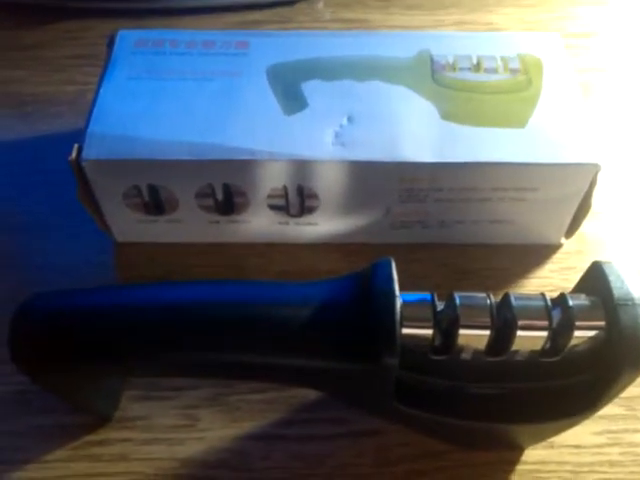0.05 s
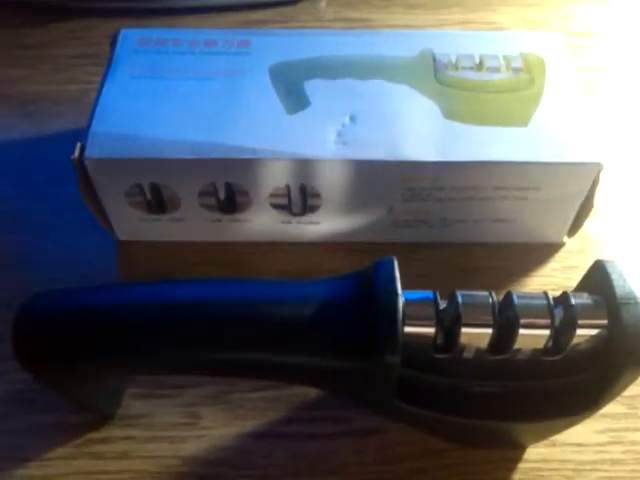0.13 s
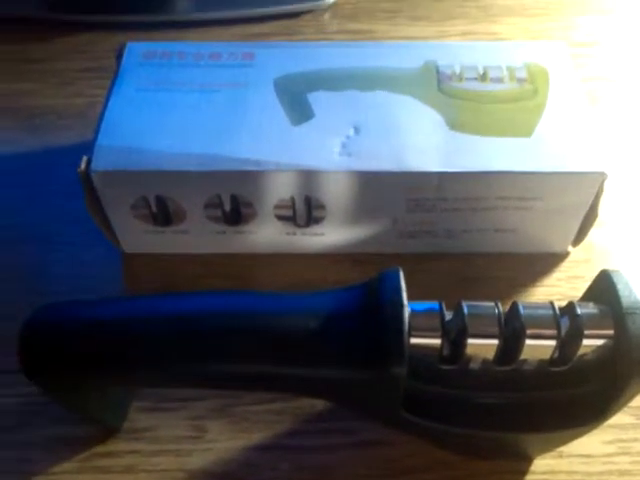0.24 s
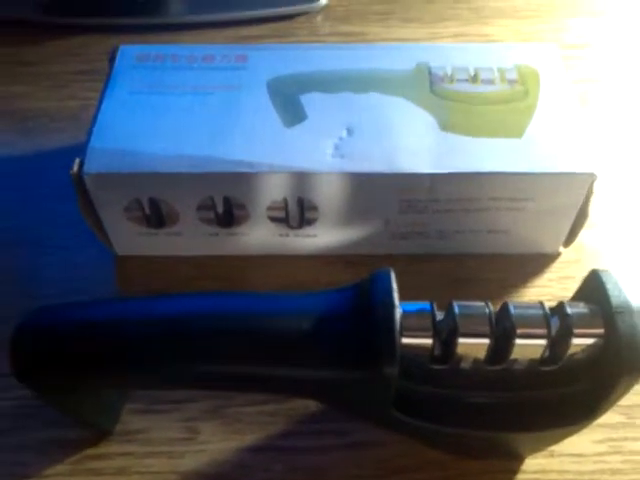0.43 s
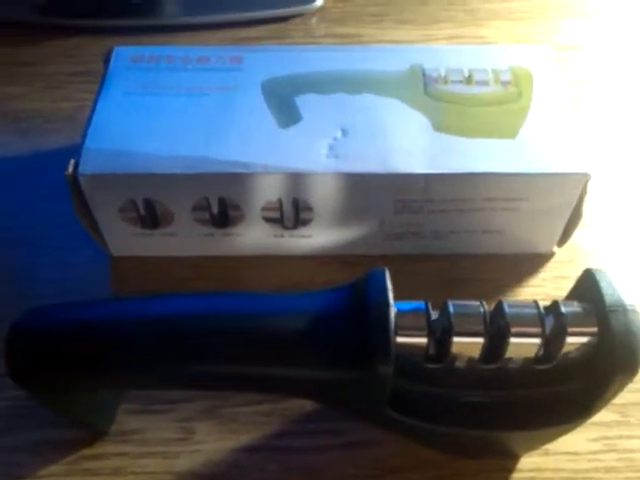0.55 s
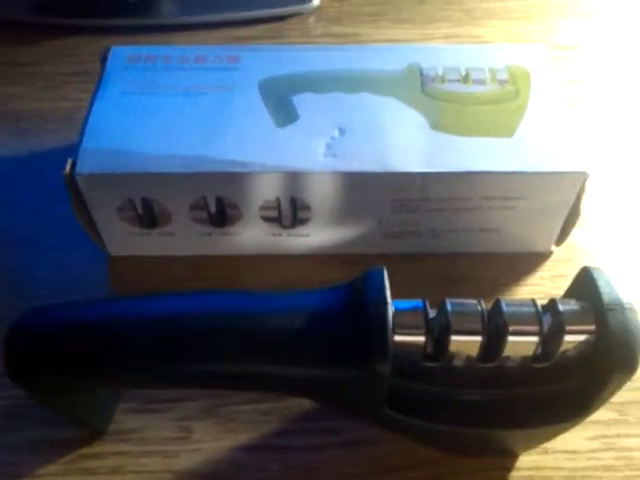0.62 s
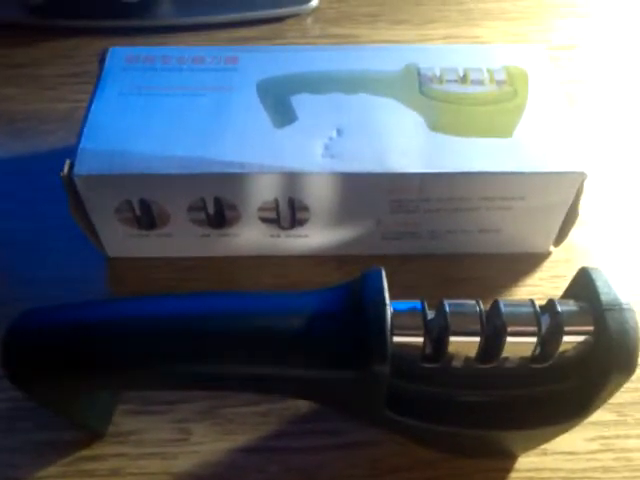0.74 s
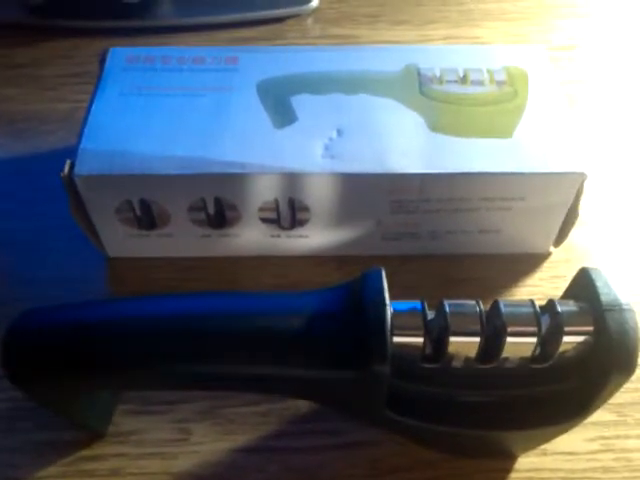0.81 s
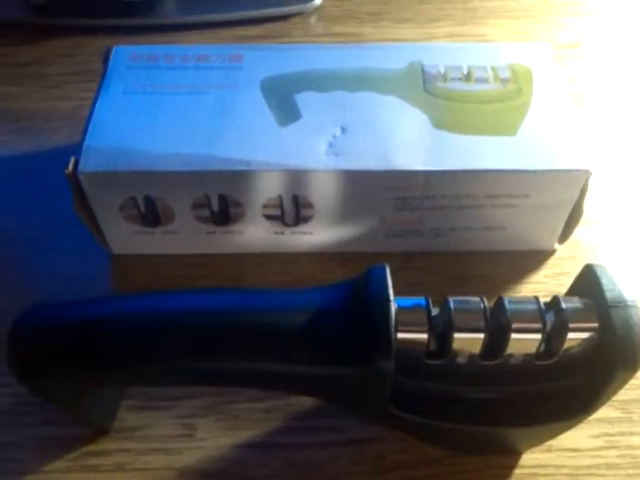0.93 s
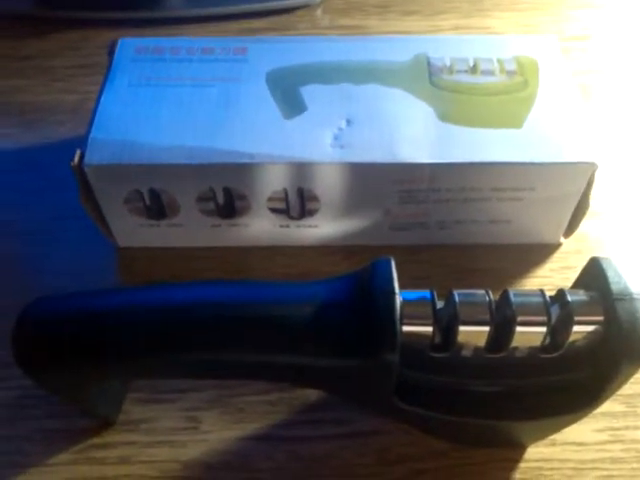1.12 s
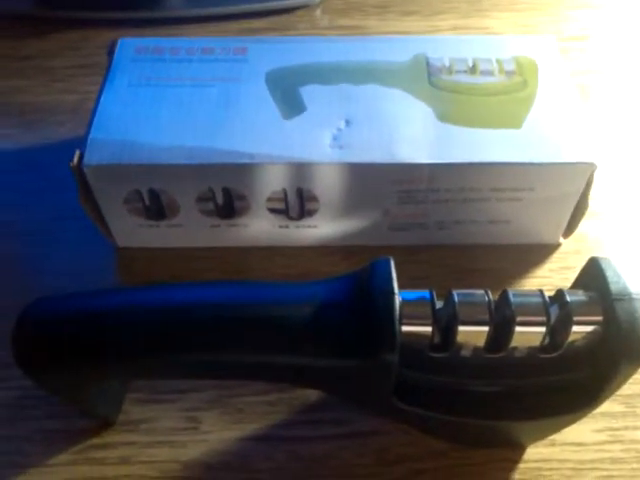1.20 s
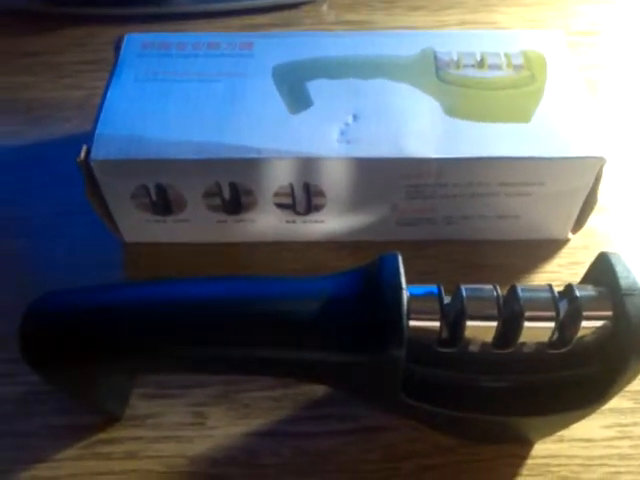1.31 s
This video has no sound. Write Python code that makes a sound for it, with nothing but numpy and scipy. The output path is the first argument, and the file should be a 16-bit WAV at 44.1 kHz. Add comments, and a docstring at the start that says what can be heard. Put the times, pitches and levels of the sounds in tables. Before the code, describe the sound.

One sharp plastic click, with faint ticks over a steady hiss.

```python
"""A small plastic device is held near a microphone, above a wooden table. First its case ticks faintly.
Then a soft nudge and a brief rub lead into one sharp click: the shell snaps and rings for a few
milliseconds, with a very faint echo. About a second later the case ticks again.
All along there is steady microphone hiss, a trace of mains hum and a thin high whine."""
import sys
import numpy as np
from scipy import signal
from scipy.fft import rfft, irfft
from scipy.io import wavfile

SR = 44100
rng = np.random.default_rng(int(sys.argv[2]) if len(sys.argv) > 2 else 0)


def int16_out(signal):
    """Quantize to a 16-bit WAV file."""
    q = np.round(np.clip(np.atleast_2d(signal).T, -1, 1) * 32767)
    wavfile.write(sys.argv[1], SR, q.astype(np.int16))


N = 59535
CLICK_S = .20757

# The plastic shell's natural tones (pitch [Hz], relative level [dB], time to fade by 60 dB [s])
SHELL_TONES = [(603, -35.5, 0.008), (940, -41.5, 0.016), (1230, -42.5, 0.014), (2390, -31, 0.0023),
               (2910, -30.5, 0.0074), (4094, -9.5, 0.0048), (4800, -17.5, 0.0065), (5230, -10, 0.0055),
               (5800, 1.04, .0017), (7100, -3, 0.0014), (9200, -34.5, 0.0051), (10165, -16.5, 0.0026),
               (12200, -19, .0014), (13600, -32, 0.0045)]
def click():
    """The snap makes the shell ring; nearby surfaces send back a faint, short echo."""
    snap = gain(0.04) * ring(CLICK_S, SHELL_TONES)
    echo = gain(-54) * fade(since(CLICK_S), fade_s=.085) * band_noise(low_hz=1400, high_hz=7500)
    return snap + echo


def press():
    """A soft, low nudge, then plastic rubs on plastic until it snaps."""
    start_s, nudge_hz, nudge_db, fade_s = .1968, 160, -41.5, 0.0085
    nudge = ring(start_s, [(nudge_hz, nudge_db, fade_s)])
    sliding = (since(start_s) > 0) & (since(CLICK_S) == 0)
    rub = gain(-59) * sliding * band_noise(low_hz=3500, high_hz=8000)
    return nudge + rub


# The tones in a tick (base pitch [Hz], relative level [dB], time to fade by 60 dB [s])
TICK_TONES = [(2000, -12, .0025), (4200, -4, 0.0034), (6400, -3.5, 0.0014)]
# Light ticks of the case (time [s], level [dB], pitch multiplier [x])
CASE_TICKS = [(.12955, -47, 1.15), (1.2470, -35.5, 0.96)]
def ticks():
    """The case ticks lightly in the hand, ringing briefly each time."""
    return sum(gain(db) * ring(start, TICK_TONES, pitch) for start, db, pitch in CASE_TICKS)


# How strong the hiss is from bass to treble (frequency [Hz], relative level [dB])
HISS_SHAPE = [(20, 7), (100, 5), (300, 3), (1000, 1), (4000, 0), (15500, -1.3)]
def hiss():
    """The microphone hisses steadily, a little stronger in the bass."""
    hz, db = np.array(HISS_SHAPE).T
    top_hz = 15800
    return gain(-65.5) * noise(lambda f: gain(np.interp(np.log(f), np.log(hz), db)) * (f < top_hz))


def hum_and_whine(hum_hz=49, whine_hz=15626):
    """Mains power hums faintly under a thin electrical whine."""
    angle_per_hz = 2 * np.pi * since(0)
    hum = gain(-82) * np.sin(hum_hz * angle_per_hz)
    whine = gain(-84) * np.sin(whine_hz * angle_per_hz)
    return np.sqrt(2) * (hum + whine)


def gain(db):
    """Turn decibels into a number to multiply a sound by."""
    return 10 ** (np.asarray(db) / 20)


def since(start):
    """Seconds gone by since the start, zero before it."""
    return np.maximum(np.arange(N) / SR - start, 0)


def fade(age, fade_s):
    """Silent until the start, then dying away by 60 dB every fade_s seconds."""
    return (age > 0) * np.exp(-np.log(1000) * age / fade_s)


def ring(start, tones, pitch=1):
    """Fading tones after one knock; neighbouring tones swing opposite ways."""
    age = since(np.round(start * SR) / SR)
    return sum((-1) ** k * gain(db) * fade(age, fade_s) * np.sin(2 * np.pi * hz * pitch * age)
               for k, (hz, db, fade_s) in enumerate(tones))


def noise(gain_at):
    """Noise of overall strength 1; gain_at sets each frequency's share."""
    hz = np.maximum(np.fft.rfftfreq(N, 1 / SR), 1)
    shaped = irfft(rfft(rng.standard_normal(N)) * gain_at(hz), N)
    return shaped / shaped.std()


def band_noise(low_hz, high_hz):
    """Noise that drops off gently below low_hz and steeply above high_hz."""
    return noise(lambda f: 1 / np.sqrt((1 + (low_hz / f) ** 4) * (1 + (f / high_hz) ** 16)))


def scene():
    """All the sounds add up at one microphone."""
    return (click() + press() + ticks() + hiss() + hum_and_whine())[None]


def record(dry):
    """The recorder cuts off the very highest treble."""
    top_hz = 16400
    return signal.sosfilt(signal.ellip(8, .1, 70, top_hz, fs=SR, output="sos"), dry)


dry = scene()
out = record(dry)
int16_out(out)
```